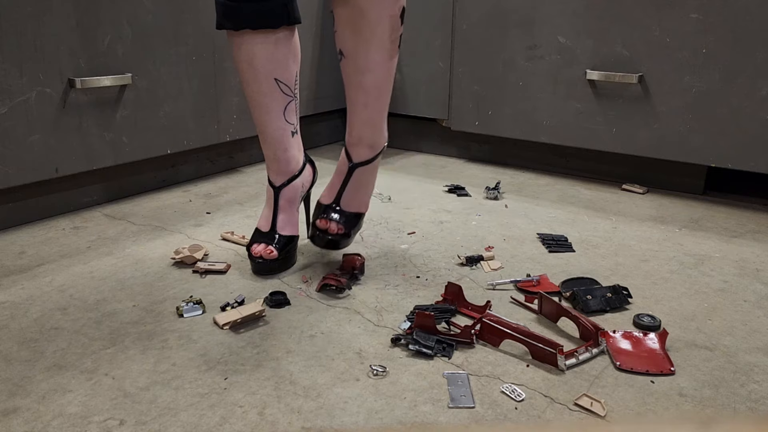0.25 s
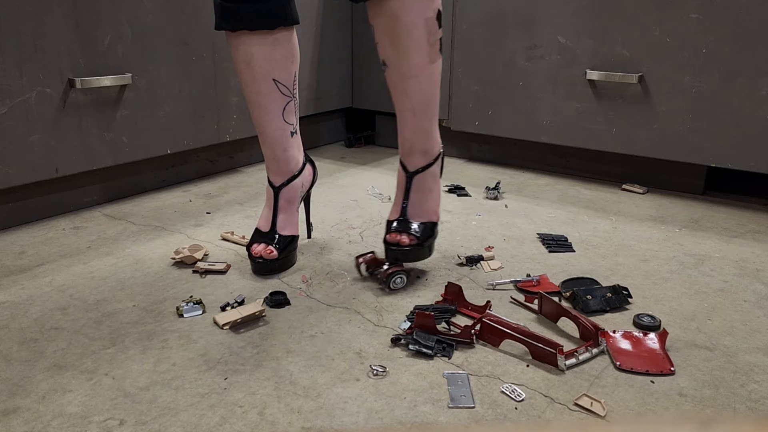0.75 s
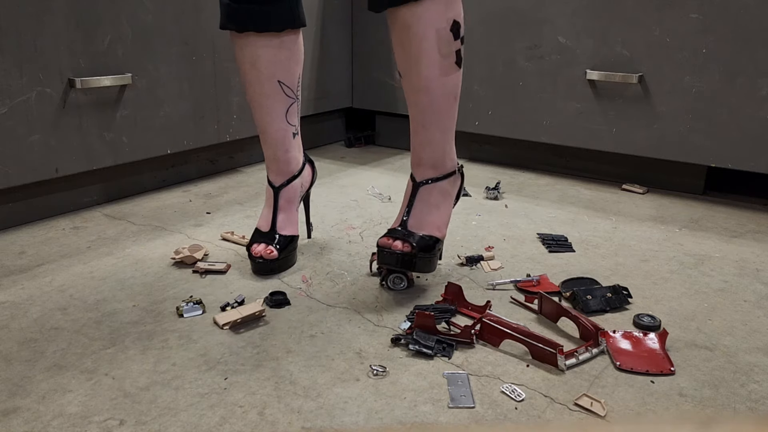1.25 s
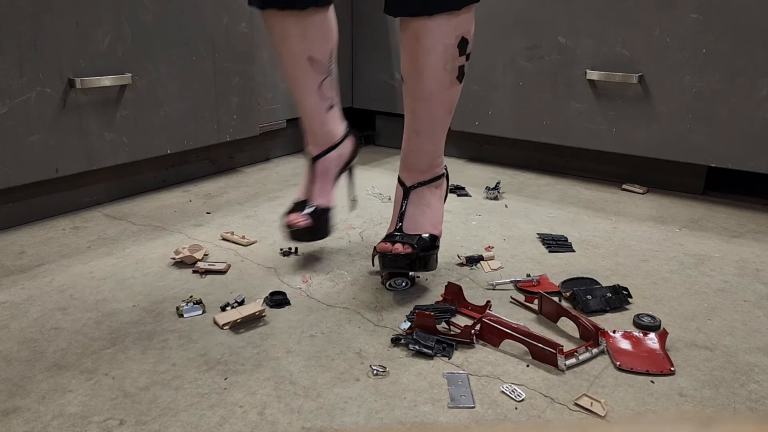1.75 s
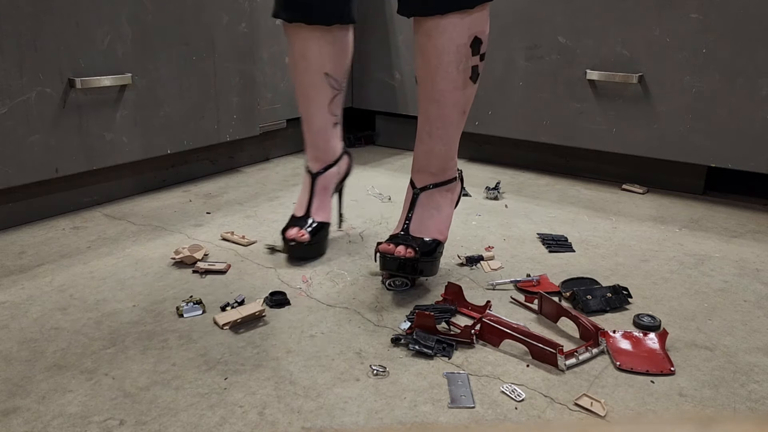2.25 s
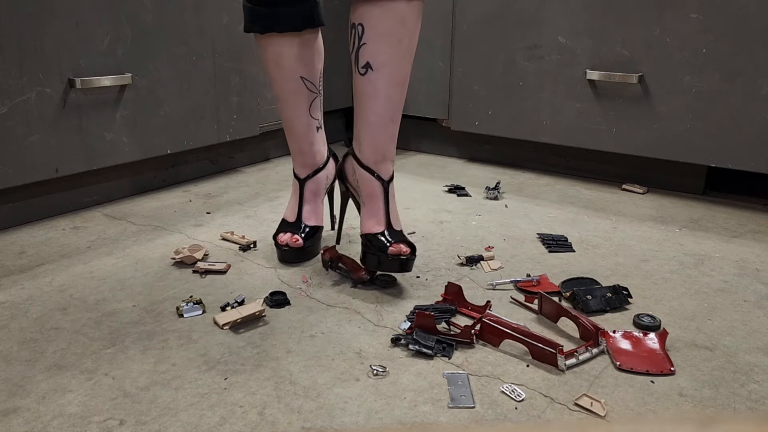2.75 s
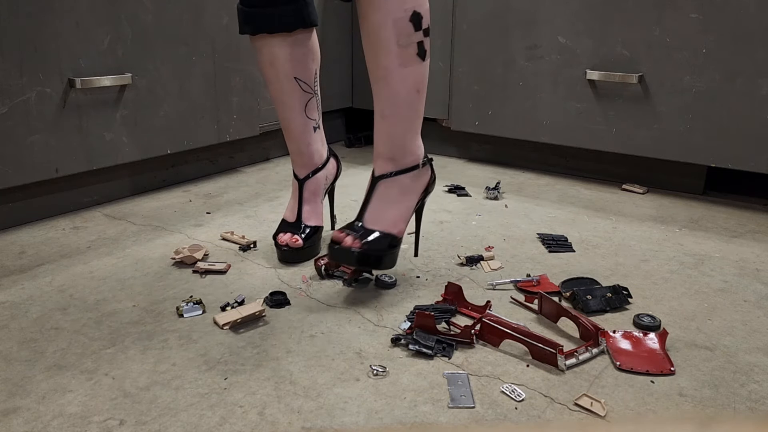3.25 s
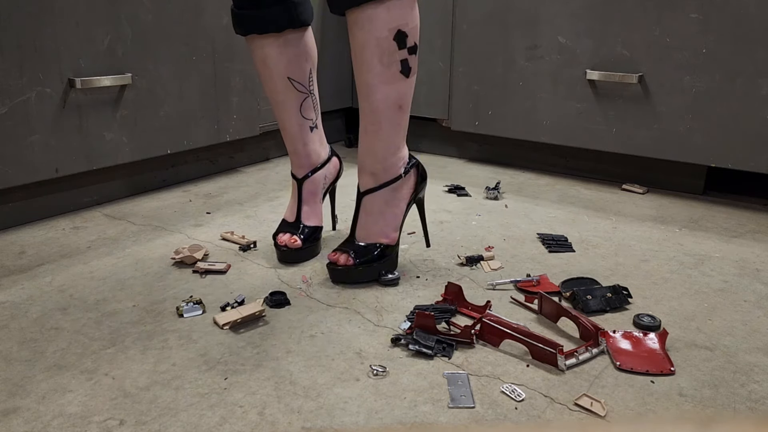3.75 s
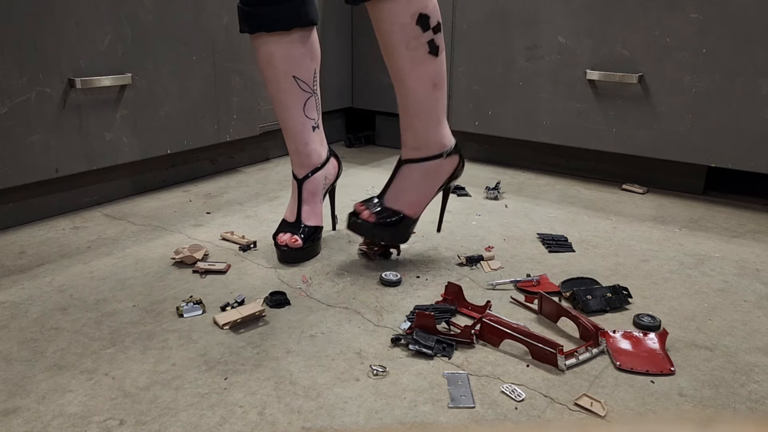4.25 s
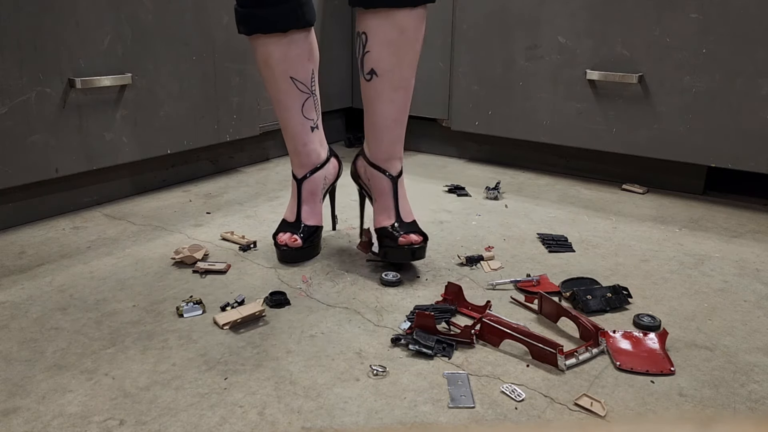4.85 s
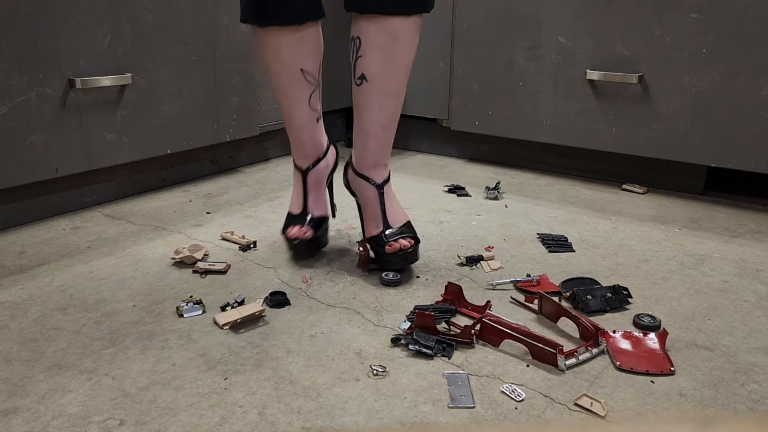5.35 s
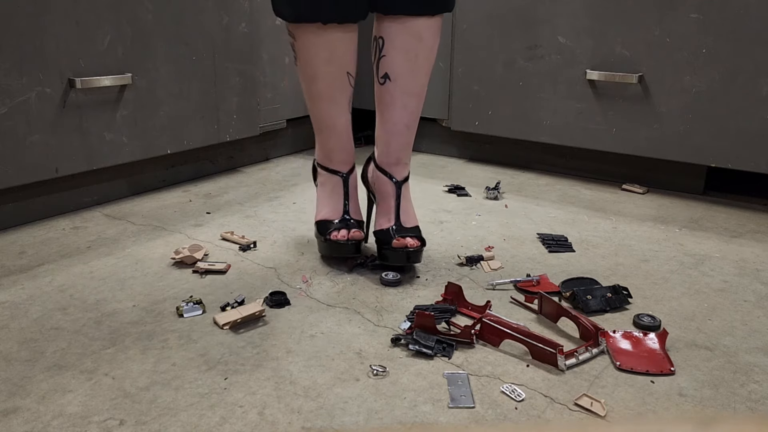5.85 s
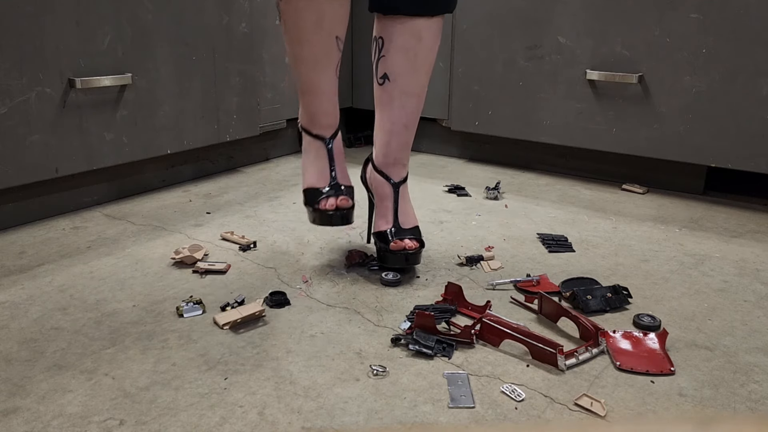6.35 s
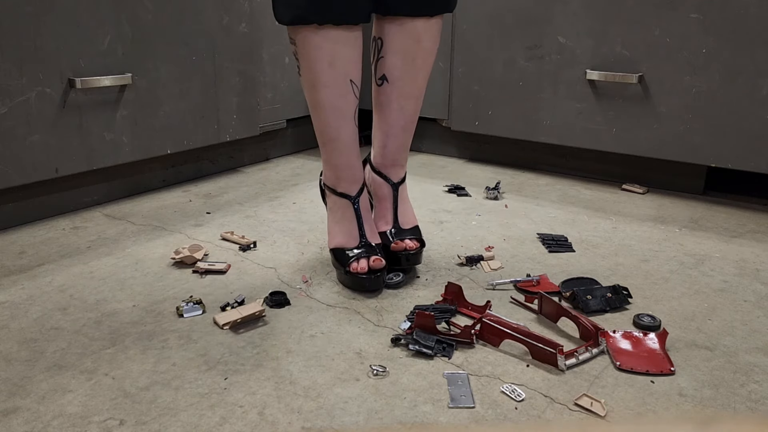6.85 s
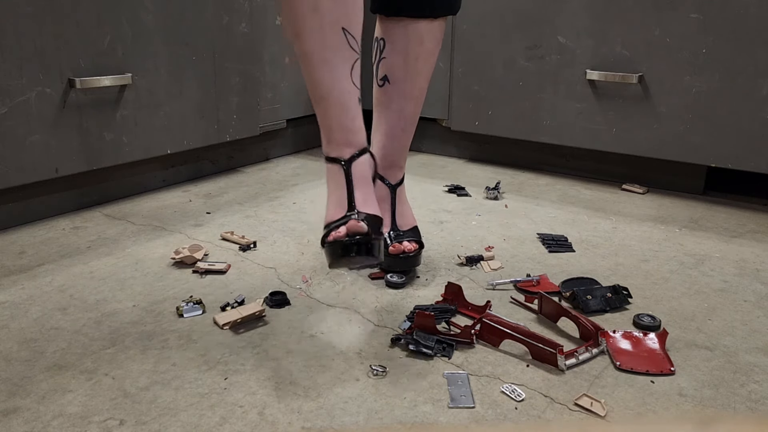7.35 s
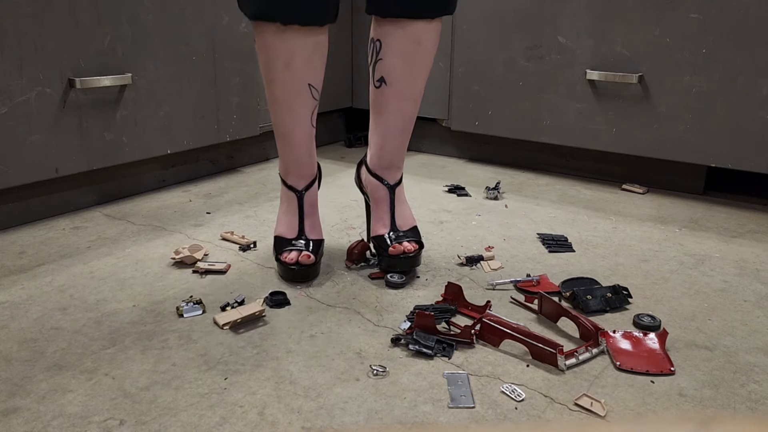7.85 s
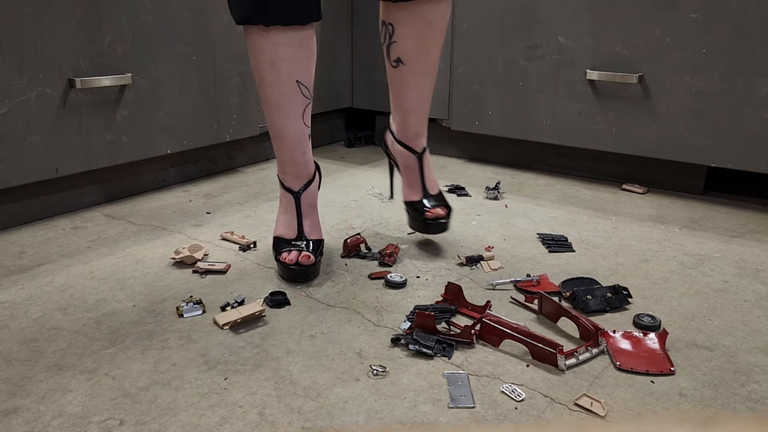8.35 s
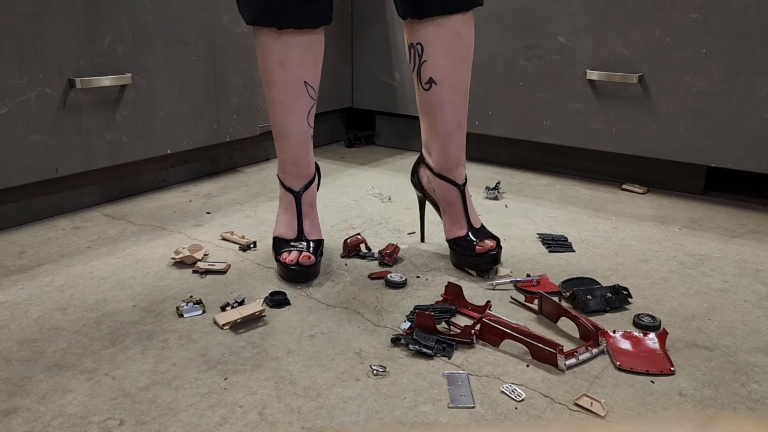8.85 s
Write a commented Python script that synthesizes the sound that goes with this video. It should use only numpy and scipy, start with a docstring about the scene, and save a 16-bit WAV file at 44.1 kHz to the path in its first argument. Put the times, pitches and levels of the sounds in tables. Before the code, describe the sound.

Brittle plastic creaks and cracks under hard-soled shoes in an echoing room, building to a heavy smash and skittering shards.

```python
"""Platform high heels tread and stamp on a plastic model car on the concrete floor of a room lined with cabinets.
The plastic creaks and snaps: bursts of tiny random breaks set the resonances of shell and pieces ringing.
Soles land as damped knocks with a thud; a piece squeaks on one wavering note and scrapes in random slips.
A last hard stamp scatters fragments, each a small crack on its own note, and one part rings clear.
Random echoes make the hard room ring after every blow, over filtered-noise air and a low machine rumble."""
import sys
import numpy as np
from scipy import signal
from scipy.fft import rfft, irfft, next_fast_len
from scipy.io import wavfile
from scipy.ndimage import uniform_filter1d

SR = 44100
rng = np.random.default_rng(int(sys.argv[2]) if len(sys.argv) > 2 else 0)


def generate_wav(sig):
    """Save sig (samples, or channels by samples) to the path in sys.argv[1] as 16-bit PCM at SR."""
    pcm = np.round(np.clip(np.atleast_2d(sig).T, -1, 1) * 32767).astype(np.int16)
    wavfile.write(sys.argv[1], SR, pcm)


N = 401751  # length of the scene [samples]
LONG = next_fast_len(N, True)  # a length at least N that transforms quickly [samples]
SIZE = 8192  # length of one crack, step or ping [samples]
HZ = np.fft.rfftfreq(SIZE, 1 / SR)


def amp(db):
    """Turns decibels into a gain."""
    return 10 ** (np.asarray(db) / 20)


def evened(x):
    """Scales a signal to an rms (average strength) of 1."""
    return x / np.sqrt(np.mean(abs(x) ** 2) + 1e-20)


def read(points, hz):
    """Reads a table between its points, with frequency on a log scale."""
    f, value = np.transpose(points)
    return np.interp(np.log(hz + 1), np.log(f + 1), value)


def add(mix, s, sound):
    """Mixes a sound in at time s."""
    start = max(round(s * SR), 0)
    part = mix[..., start:][..., :sound.shape[-1]]
    part += sound[..., :part.shape[-1]]


def causal(gain):
    """The minimum-phase response with this gain: a sharp start, then decay."""
    log_gain = np.log(np.maximum(gain, 1e-5))
    mirrored = np.r_[log_gain, log_gain[-2:0:-1]]
    return np.exp(np.conj(signal.hilbert(mirrored)))[:len(gain)]


def mode(f, hz, width):
    """Response of one resonance, gain 1 at its centre; a wider one dies away faster."""
    return 1j * f * width / (hz ** 2 - f ** 2 + 1j * f * width)


def arch(u, roundness):
    """Swells from nothing and dies away as u runs from 0 to 1; small roundness gives a flat top."""
    return np.maximum(np.sin(np.pi * np.clip(u, 0, 1)), 1e-9) ** roundness


# how alike the sound is at the two microphones: (frequency [Hz], likeness [0-1])
MICROPHONE_LIKENESS = [(120, 0.96), (250, .8), (500, 0.6), (1000, 0), (3000, .05), (16000, 0.1)]


def pair(z, hz):
    """Makes two unrelated spectra alike in the bass, as close microphones hear them."""
    angle = np.arccos(np.clip(read(MICROPHONE_LIKENESS, hz), 0, 1)) / 2
    shared, opposed = np.cos(angle) * z[0], np.sin(angle) * z[1]
    return np.array([shared + opposed, shared - opposed])


# how long the room's late ring takes to fall by 60 dB: (frequency [Hz], decay time [s])
ROOM_DECAY = [(80, .3), (160, 0.31), (400, 0.65), (1000, 0.72), (2800, 0.71), (7000, 0.54), (14000, 0.32)]


def room(direct_db=-13.0, early_db=-4.0, early_t60=0.13, late_db=-5.5, cabinet_db=-9, cabinet_s=0.0042,
         port_s=.00008):
    """Response from one floor spot: direct sound (left first), a cabinet bounce, dense echoes, a long tail."""
    t = np.arange(SR * 3 // 4) / SR
    # the late tail: sparse random echoes, each pitch region dying at its own rate
    noise = rng.standard_normal((2, len(t))) * (rng.random((2, len(t))) < .2)
    hz, at, z = signal.stft(noise, SR, nperseg=256)
    decay = amp(-60 * at / read(ROOM_DECAY, hz)[:, None])
    late = signal.istft(z * decay, SR, nperseg=256)[1][:, :len(t)]
    late *= np.clip(t / 0.011, 0, 1)
    # the early echoes: sparser, and decaying alike at all pitches
    early = rng.standard_normal((2, len(t))) * (rng.random((2, len(t))) < .1) * (t > .002)
    early *= amp(-60 * t / early_t60)
    echoes = (amp(late_db) * evened(late) + amp(early_db) * evened(early)) / np.sqrt(len(t))
    response = irfft(pair(rfft(echoes), np.fft.rfftfreq(len(t), 1 / SR)), len(t))
    right_delay = int(port_s * SR * rng.uniform(.5, 1.5))
    response[[0, 1], [0, right_delay]] += amp(direct_db)
    bounce = cabinet_s * SR * (rng.uniform(.85, 1.15) + rng.uniform(-.02, .02, 2))
    response[[0, 1], bounce.astype(int)] += amp(cabinet_db)
    return response


def heard(sounds, responses):
    """Sounds fall in turn on several spots of the floor, each with its own echoes."""
    longest = max(sound.shape[-1] for _, sound in sounds)
    size = next_fast_len(longest + responses[0].shape[-1], True)
    spots, mix = rfft(np.array(responses), size), np.zeros((2, N))
    for k, (s, sound) in enumerate(sounds):
        add(mix, s, irfft(rfft(sound, size) * spots[k % len(spots)], size))
    return mix


# colour of the room air: (frequency [Hz], relative level [dB per Hz])
AIR_COLOUR = [(15, -36.5), (25, -17), (60, -12), (105, -9), (135, -8.5), (200, -28.5), (300, -31.5),
              (430, -26.5), (800, -35.5), (1400, -35), (2500, -40), (5000, -46.5), (6500, -42.5),
              (7900, -34.5), (8600, -39.5), (9200, -45), (16000, -49.5)]
AIR_DB = -69.5  # level of the air between 300 and 9000 Hz [dB]
# the rumble swells now and then: (start [s], length [s], level [dB])
RUMBLE_SWELLS = [(.15, 1.22, -54), (2.85, 1.55, -53.5)]


def background(rumble_hz=88, rumble_width=16, rumble_db=-66, roundness=1.0):
    """Still room air is coloured noise; a distant machine rumbles as noise through one low resonance."""
    f = np.fft.rfftfreq(LONG, 1 / SR)
    air = pair(rfft(rng.standard_normal((2, LONG))), f) * amp(read(AIR_COLOUR, f))
    middle = irfft(air * ((f > 300) & (f < 9000)), LONG)
    air = irfft(air, LONG)[:, :N] / middle.std()
    rumble = rfft(rng.standard_normal(LONG)) * mode(f, rumble_hz, rumble_width) ** 2
    rumble = evened(irfft(rumble, LONG)[:N])
    t = np.arange(N) / SR
    swell = sum(amp(db) * arch((t - start) / length, roundness) for start, length, db in RUMBLE_SWELLS)
    return amp(AIR_DB) * air + rumble * np.hypot(amp(rumble_db), swell)


# colour that all breaks share: (frequency [Hz], relative level [dB per Hz])
BREAK_COLOUR = [(50, -31.5), (200, -9.5), (600, 0), (1400, 1), (3000, -0.28), (6300, 0), (11500, 0.53)]
PIVOT_HZ, LIFT_OCTAVES = 2994, 0.8  # brightness tilts about this pitch; width of the lift around a piece's note


def fracture_colour(brightness, note_hz, lift_db, low_hz, knee_hz=600, top_hz=11500):
    """Spectrum of a break in dB: a tilt, a broad lift where the piece radiates best, and little below low_hz."""
    tilt = brightness * np.log2(np.clip(HZ, knee_hz, top_hz) / PIVOT_HZ)
    lift = lift_db * np.exp(-(np.log2((HZ + 1) / note_hz) / LIFT_OCTAVES) ** 2)
    bass_loss = 10 * np.log10(1 + (low_hz / (HZ + 1)) ** 2)
    return read(BREAK_COLOUR, HZ) + tilt + lift - bass_loss


# resonances of the car's shell, before each break varies them: (frequency [Hz], width [Hz], level [dB])
SHELL_MODES = [(725, 47, -8.5), (1060, 28, -14.5), (1554, 36, -12), (2317, 87, -4), (3200, 73, -3),
               (3573, 27, -7.5), (4213, 51, -11), (5350, 47, -6.5), (5770, 100, -6), (6410, 140, -1.5),
               (7443, 120, 0.5), (9100, 52, -11.5), (12134, 300, -5)]
# plastic cracking: (time [s], level [dB], brightness [dB per octave], splintering time [s],
# note of the broken piece [Hz], lift around that note [dB])
PLASTIC_CRACKS = [(0, -7.5, -1.6, 0.021, 2170, 8.5), (0.1509, -13.5, -3, 0.011, 6750, 9.5),
                  (.3025, -3.5, -2, 0.0099, 2700, 6.5), (0.3783, -13.5, -0.7, 0.0053, 5080, 8.5),
                  (0.4273, -11, -1.5, 0.0076, 3020, 2.5), (0.827, -22, -3.5, 0.011, 5000, 8),
                  (0.8544, -9, -2.5, 0.0047, 2980, 14.5), (.8795, -.5, -0.8, 0.003, 2710, 7),
                  (0.9566, -5, -2.5, .006, 1000, 1.5), (.9712, -2.5, 0.5, 0.0036, 1000, 0),
                  (1.0574, -7, -2, .009, 900, 6), (1.304, -12, -.1, 0.016, 485, 9.5),
                  (1.3743, -9, -3, 0.0035, 7760, 8), (1.5774, -9.5, -3.5, 0.0026, 910, 3),
                  (1.8022, -17.5, -3, 0.009, 2200, 5), (1.9609, 6.5, 0.94, 0.0035, 6500, 7.5),
                  (2.1786, 15.5, -1.6, 0.0032, 5080, 7.5), (2.2094, 7.5, 0.7, 0.0033, 2200, 5),
                  (2.235, 15.5, 0.6, .0035, 3000, 10.5), (2.2433, 8.5, -0.7, 0.0026, 3000, 12),
                  (2.3544, 20.5, 2.1, 0.005, 4500, 5), (2.6423, 10.5, 2, 0.0018, 5770, 3),
                  (2.666, 2, 4, 0.0033, 5580, 5), (3.036, -13.5, 1, .012, 3000, 4),
                  (3.0491, 11, -.6, 0.0072, 3150, 10), (3.0695, 21, 1.26, 0.0037, 5400, 4),
                  (3.0784, 12, -1.5, 0.013, 7400, 7), (3.471, -13.5, -2.5, 0.0034, 6500, 8),
                  (3.523, -20.5, -2.3, 0.0018, 5700, 9.5), (4.3256, -22.5, 1, .012, 5500, 5),
                  (4.525, -21, -1, .011, 7100, 7), (4.5461, -2, -1.8, .003, 6630, 9),
                  (4.549, -9, -1, .005, 1390, 14), (4.6605, -7, -0.6, 0.0036, 2870, 15.5),
                  (4.8106, -14.5, -1, 0.0072, 5500, 2.5), (5.3395, -9, 2, .003, 3830, 12.5),
                  (5.524, -19, 1, 0.0081, 2200, 10.5), (5.5451, -12.5, 2, 0.0062, 6750, 2.5),
                  (5.859, -28, 0, .005, 7440, 1), (6.5931, -13.5, 1.1, 0.0062, 3300, 9),
                  (6.8162, -29.5, -3.5, .005, 1810, 9.5), (6.963, -7, 1, 0.0096, 7000, 4),
                  (7.012, -9, -1.2, 0.019, 3400, 7), (7.2787, -17, -0.2, 0.011, 3300, 5.5),
                  (7.3029, -10.5, 1, 0.0076, 3000, 7), (8.271, -5, -2.2, 0.01, 2600, 2),
                  (8.2865, 16, -2.5, 0.0017, 1430, 6.5), (8.295, 17, 1.5, 0.0062, 2360, 9.5),
                  (8.306, 13.5, 2, 0.015, 7740, 1.5), (8.3724, -1, -1.5, 0.0098, 7950, 5),
                  (8.426, 0, 2.8, 0.013, 3220, 9), (8.5474, 12, 4.3, .0062, 8400, 0.5),
                  (8.668, 5.5, 2, 0.025, 5050, 5.5), (8.8436, -9.5, 1, .016, 4300, 9)]


def crack(row, splinters_per_s=800, clean_s=0.0065, shell_db=0, ring_db=-2, ring_width=330, low_hz=40):
    """A fracture runs as a burst of tiny breaks; the shell and the broken piece ring with it."""
    s, level_db, brightness, splinter_s, ring_hz, lift_db = row
    u = np.arange(SIZE) / SR / splinter_s
    splinters = rng.standard_normal(SIZE) * (rng.random(SIZE) < splinters_per_s / SR)
    breaks = splinters * (np.exp(-u) - np.exp(-5 * u))
    # a quick fracture opens with one clean snap, a slow one swells into a crunch
    burst = evened(rfft(breaks)) + min(clean_s / splinter_s, 2)
    # each break excites the modes with its own strength [dB], and the load bends their pitch [share]
    chance = rng.standard_normal((len(SHELL_MODES), 2)) * [4, .04]
    body = 1
    for (hz, width, db), (extra_db, bend) in zip(SHELL_MODES, chance):
        body = body + amp(shell_db + db + extra_db) * mode(HZ, hz * (1 + bend), width)
    body = body + amp(ring_db) * mode(HZ, ring_hz, ring_width)
    # even out the broad spectrum, so that the colour and level alone set it
    spread = np.sqrt(uniform_filter1d(abs(body * burst) ** 2, size=400))
    colour = amp(level_db + fracture_colour(brightness, ring_hz, lift_db, low_hz))
    return s, irfft(burst * body * causal(colour / spread))


# faint creaking while the foot's weight shifts on the pieces:
# (start [s], length [s], level [dB], brightness [dB per octave])
CREAK_SPELLS = [(0, 0.55, -23, -3), (1.05, .13, -20.5, 0.5), (1.279, 0.21, -28, -3.5), (3.302, .4, -35, -4),
                (5.679, 0.41, -35, -8)]


def creaks(splinter_s=.012, lift_db=4, vary_db=1.0, count=6):
    """Loaded plastic gives way in small uneven crunches, each on one of the shell's notes."""
    for start, length, db, brightness in CREAK_SPELLS:
        for k, (late, size, note) in enumerate(rng.random((count, 3))):
            s = start + length * (k + late) / count
            level_db = db + vary_db * (2 * size - 1)
            hz = SHELL_MODES[int(note * len(SHELL_MODES))][0]
            yield crack((s, level_db, brightness, splinter_s, hz, lift_db))


# sole or heel meeting the ground: (time [s], level [dB], knock pitch [Hz], thud of the body's weight [dB])
FOOTSTEPS = [(0.237, -8, 640, -22), (0.4425, -1.5, 493, -16), (0.9729, 4.5, 1020, -10),
             (1.0582, 7, 820, -2.5), (1.4164, -3, 514, -24), (1.5623, 0.5, 780, -10.5),
             (1.5776, -10, 1020, -10), (2.2352, 21, 712, 9), (2.3555, 14.5, 683, 15),
             (3.057, 17, 560, 14.5), (3.083, 20.5, 686, 12.5), (3.442, -5, 610, -4),
             (4.3523, 2.5, 430, -25), (4.4394, 2, 522, -13.5), (5.3146, 3, 420, -13), (6.186, 24, 779, -4),
             (7.012, -4.5, 480, -10), (8.2863, 33.5, 650, 28.5), (8.306, 23, 620, 17), (8.334, 28, 428, 24),
             (9.095, -6.5, 493, -25)]


def step(row, damping=0.64, softness=2.59, grit_db=-38, thud_hz=100, thud_width=115,
         hollow_hz=245, hollow_width=120, hollow_db=-1):
    """A hard sole gives a damped knock, rounded by its contact time, a thud, a hollow platform note and grit."""
    s, db, hz, thud_db = row
    contact = causal(1 / np.sqrt(1 + (HZ / (softness * hz)) ** 8))
    grit = amp(grit_db) * mode(HZ, 7000, 8000)
    knock = mode(HZ, hz, damping * hz) * contact + grit
    hollow = amp(hollow_db) * mode(HZ, hollow_hz, hollow_width)
    thud = mode(HZ, thud_hz, thud_width) ** 2 - hollow
    return s, irfft(amp(db) * knock + amp(thud_db) * thud)


# plastic squeaking against the patent shoe: (start [s], length [s], level before it fades [dB], pitch [Hz])
SHOE_SQUEAKS = [(3.65, 0.23, -72.5, 1378), (5.698, 0.33, -66, 1380), (6.994, 0.035, -20.5, 6750)]


def squeak(row, waver=.02, octave_db=-12, left_db=1.0, attack_s=0.0064, release_s=0.0051, fade_db=-11, sag=0.011):
    """Stick-slip locks onto one unsteady note that sags and fades as the pressure eases."""
    start, length, db, hz = row
    t = np.arange(0, length, 1 / SR)
    wobble = evened(uniform_filter1d(rng.standard_normal(len(t)), size=70))
    pitch = hz * (1 - sag * t / length + waver * wobble)
    phase = 2 * np.pi * np.cumsum(pitch) / SR
    note = evened(np.sin(phase) + amp(octave_db) * np.sin(2 * phase))
    edges = np.minimum(np.minimum(t / attack_s, (length - t) / release_s), 1)
    envelope = edges * amp(db + fade_db * t / length)
    return start, note * envelope * amp([[left_db / 2], [-left_db / 2]])


# pieces dragged over the concrete: (start [s], length [s], level [dB])
PIECE_DRAGS = [(5.094, .04, -56), (5.125, 0.16, -30.5), (5.761, 0.052, -54), (7.771, 0.095, -59.5)]
# resonances that sing out under pressure: (frequency [Hz], width [Hz], level before the pressure acts [dB])
PRESSED_MODES = [(2453, 34, 14), (3810, 65, 15), (4710, 54, 4), (7453, 260, 9.5)]
# colour of the grinding slips: (frequency [Hz], relative level [dB per Hz])
GRIND_COLOUR = [(150, -35.5), (700, -15.5), (1700, -17.5), (2500, -3), (3200, -2.5), (4300, -7.5),
                (5500, -8.5), (8000, -6), (12000, -10), (16000, -12)]


def drag(row, slips_per_s=600, hiss=0.1, firm_db=-29, roundness=0.43, lurch_db=2.5):
    """Quick uneven slips grind on the concrete in one lurching stroke; the firmer it is, the more the piece rings."""
    start, length, db = row
    t = np.arange(0, length, 1 / SR)
    slips = rng.standard_normal(len(t)) * (hiss + (rng.random(len(t)) < slips_per_s / SR))
    f = np.fft.rfftfreq(len(t), 1 / SR)
    # a louder drag counts as a firmer one
    pressure = amp((db - firm_db) / 2)
    ring = pressure * sum(amp(level) * mode(f, hz, width) for hz, width, level in PRESSED_MODES)
    lurch = evened(uniform_filter1d(rng.standard_normal(len(t)), size=600))
    grind = evened(irfft(rfft(slips) * amp(read(GRIND_COLOUR, f)) * (1 + ring), len(t)))
    return start, grind * arch(t / length, roundness) * amp(db + lurch_db * lurch)


# notes of the loose fragments, used in turn: (frequency [Hz])
FRAGMENT_NOTES = [1118, 3180, 8600, 1640, 5300, 7800, 3280, 8320, 4080]


def scatter(start=8.33, end=8.86, first_db=2, last_db=-13, brightness=-1.4, splinter_s=0.0035, lift_db=3, count=36):
    """Fragments thrown by the stamp skitter over the floor, ever more lightly, each on its own note."""
    progress = (np.arange(count) + rng.random(count)) / count
    sizes_db = rng.uniform(-6, 4, count)
    for u, size_db, hz in zip(progress, sizes_db, np.resize(FRAGMENT_NOTES, count)):
        s = start + u * (end - start)
        db = first_db + (last_db - first_db) * u ** 2 + size_db
        yield crack((s, db, brightness, splinter_s, hz, lift_db), ring_db=27, ring_width=16, low_hz=1090)


# a small hard part that lands and rings: (frequency [Hz], level [dB], time to fall by 60 dB [s])
PING_NOTES = [(1600, -35.5, 0.32), (3210, -27.5, 0.25), (4950, -27, .07), (7600, -34, .12),
              (8430, -17.5, 0.086)]


def ping(s=8.548):
    """One thrown part strikes the concrete and rings clear, as a few decaying pure tones."""
    t = np.arange(SIZE) / SR
    tones = 0
    for hz, db, t60 in PING_NOTES:
        tones = tones + amp(db) * np.exp(-np.log(1000) * t / t60) * np.sin(2 * np.pi * hz * t)
    return s, tones


def scene(count=5):
    """Breaking plastic, shoes and rubbing in one room, over the background."""
    breaking = [crack(row) for row in PLASTIC_CRACKS] + list(creaks()) + list(scatter()) + [ping()]
    plastic = heard(breaking, [room(direct_db=-10.5, early_t60=.085) for _ in range(count)])
    shoe_spots = [room(direct_db=-7.0, early_db=-4.0, late_db=-7, cabinet_db=-11.5) for _ in range(count)]
    shoes = heard([step(row) for row in FOOTSTEPS], shoe_spots)
    rubs = [drag(row) for row in PIECE_DRAGS] + [squeak(row) for row in SHOE_SQUEAKS]
    rubbing = heard(rubs, [room(direct_db=-6, early_db=-3.0, late_db=-6)])
    # gains of the left and right sides [dB]
    return plastic * amp([[.3], [-.3]]) + shoes + rubbing * amp([[.4], [-.8]]) + background()


EDGE_HZ = 15900  # upper limit of the sound [Hz]


def record(dry, shelf_hz=8700, shelf_db=-9, dip_db=-3, quiet_db=-68, ceiling=.85):
    """The high treble sits on a lower shelf and is partly faded when faint; peaks clip; then the band limit."""
    f = np.fft.rfftfreq(LONG, 1 / SR)
    shelf = [(shelf_hz - 300, 0), (shelf_hz + 200, shelf_db + dip_db), (10800, shelf_db + dip_db), (11800, shelf_db)]
    spectrum = rfft(dry, LONG) * amp(read(shelf, f))
    treble = irfft(spectrum * read([(shelf_hz, 0), (shelf_hz + 400, 1)], f), LONG)[:, :N]
    level = np.sqrt(abs(uniform_filter1d(np.mean(treble ** 2, axis=0), size=600)))
    # share of the treble taken away: at most 0.34, less as it grows louder
    faded = 0.34 / (1 + (level / amp(quiet_db)) ** 2)
    whole = irfft(spectrum, LONG)[:, :N]
    clipped = np.clip(whole - faded * treble, -ceiling, ceiling)
    band_limit = signal.firwin(401, EDGE_HZ, window=("kaiser", 8), fs=SR)
    return signal.oaconvolve(clipped, band_limit[None], "same")


dry = scene()
out = record(dry)
generate_wav(out)
```